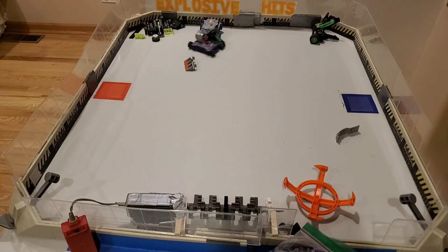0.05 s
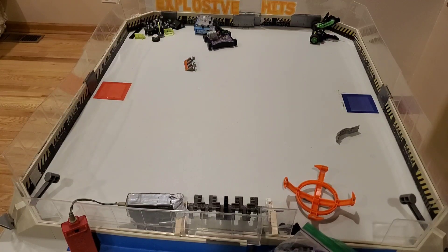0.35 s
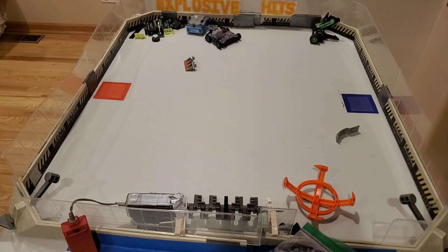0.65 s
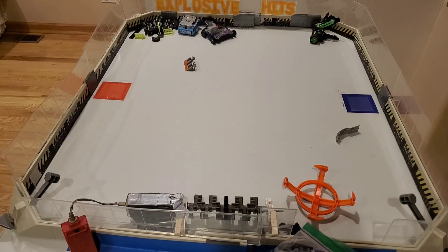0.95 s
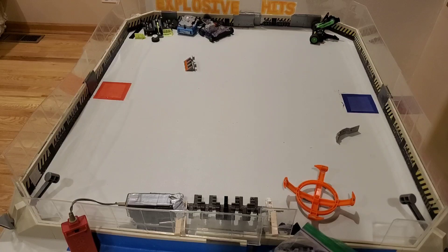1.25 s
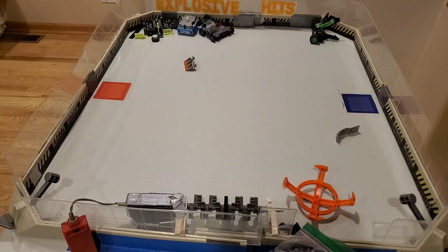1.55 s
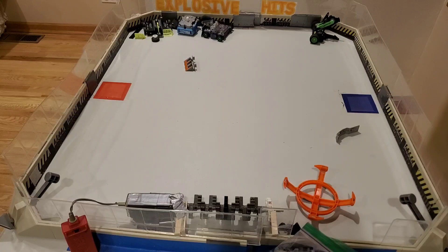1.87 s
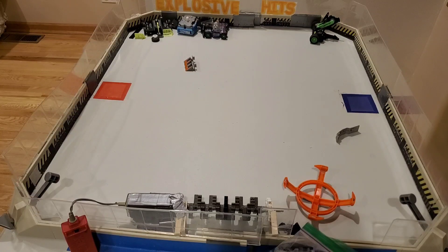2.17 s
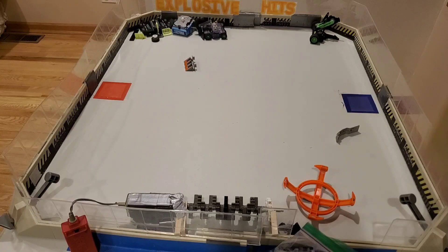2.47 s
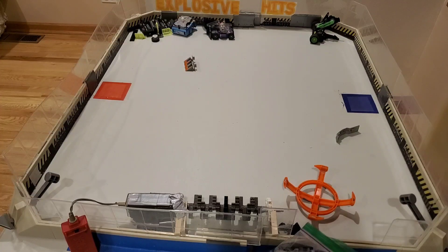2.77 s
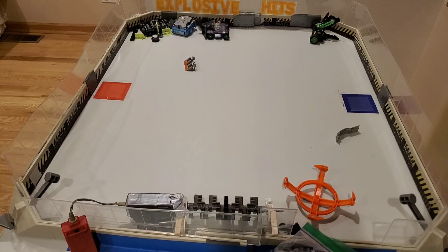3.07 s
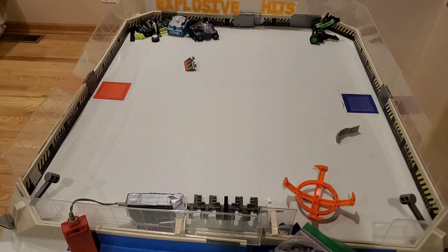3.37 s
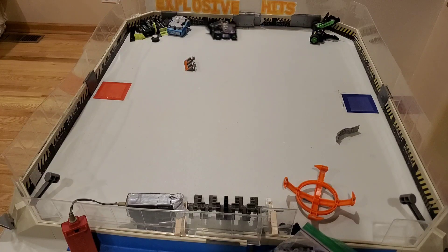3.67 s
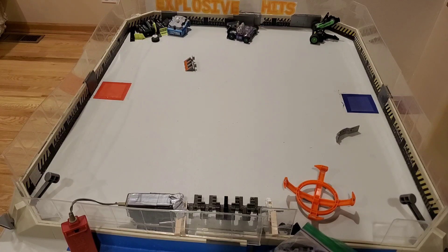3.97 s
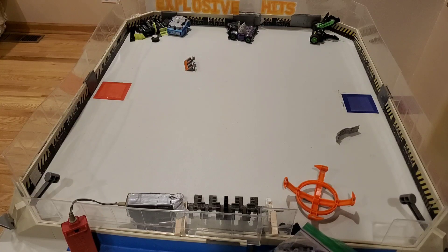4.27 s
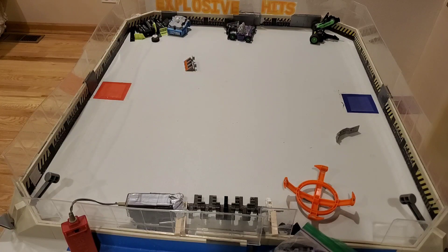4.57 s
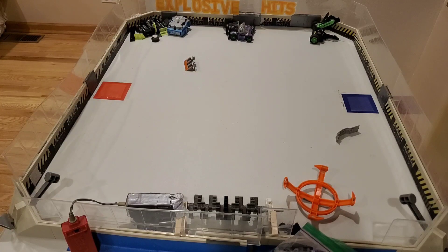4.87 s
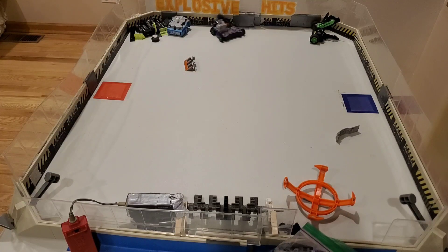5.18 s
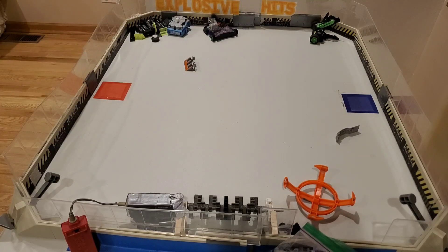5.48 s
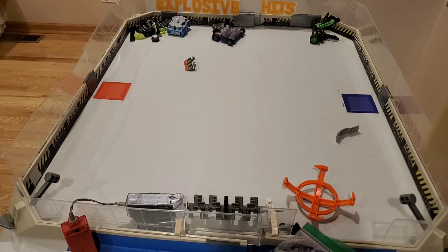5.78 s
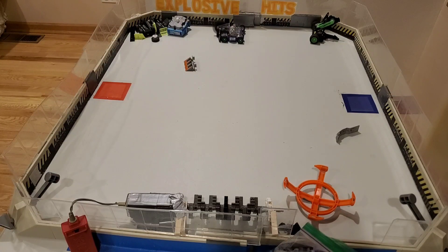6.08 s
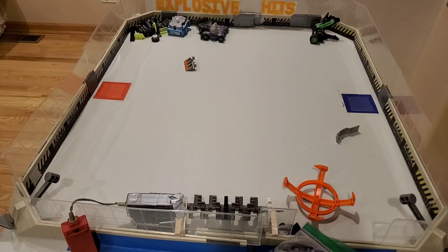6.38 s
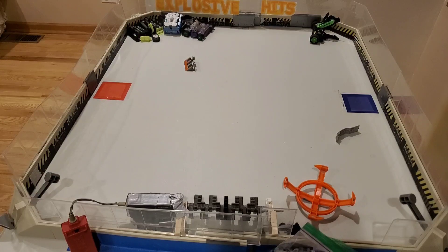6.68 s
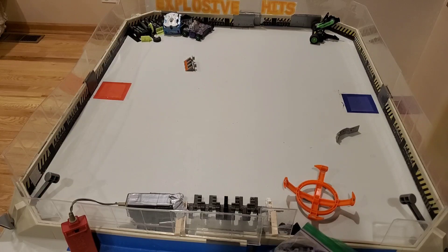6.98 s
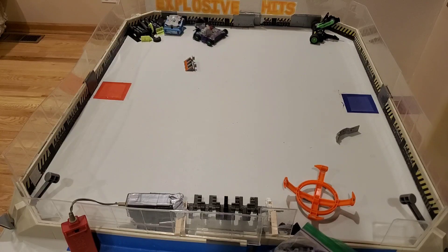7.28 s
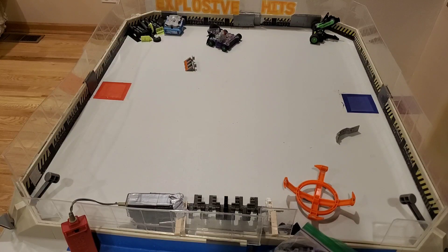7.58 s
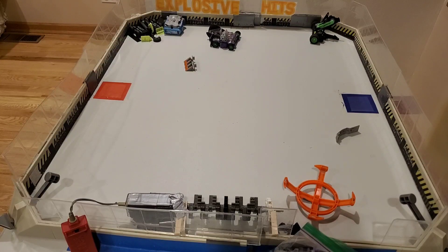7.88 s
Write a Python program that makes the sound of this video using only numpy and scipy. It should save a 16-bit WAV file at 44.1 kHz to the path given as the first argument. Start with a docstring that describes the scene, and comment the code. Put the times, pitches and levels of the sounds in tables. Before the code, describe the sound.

Two small toy robots fight in a table-top plastic arena. A spinning weapon hums through the floor with a fast, high ticking, slowing at each bite and speeding up again. Gears whirr and wheels drum in surges. Clusters of sharp clattering blows, small metallic pings and dull thuds break in. Near the end the weapon jams, leaving a faint stuttering motor buzz. The sound is in stereo, with a short room echo.

```python
"""A table-top arena with hard plastic walls, heard on a stereo pair: two small combat robots shove each
other at the far wall. An unbalanced spinning weapon hums through the floor panel and ticks once a turn;
it slows at each bite and spins up again. Gears whirr, wheels drum on the floor, blows clatter and ring,
a chassis thuds down. Then the weapon jams and a drive motor buzzes on faintly."""
import sys
import numpy as np
from scipy import signal
from scipy.fft import rfft, irfft
from scipy.io import wavfile

SR = 44100
rng = np.random.default_rng(int(sys.argv[2]) if len(sys.argv) > 2 else 0)


def write(x):
    x = np.atleast_2d(x).T
    wavfile.write(sys.argv[1], SR, np.round(np.clip(x, -1, 1) * 32767).astype(np.int16))


N = 354563
T = np.arange(N) / SR

# Modes of the floor panel, lowest first. Each row: frequency in Hz, width in Hz, gain in dB.
PANEL_MODES = [(54.2, 7.2, -8), (131.6, 21.5, 2.5), (193, 35, -4.5), (217.4, 30, -5.5), (247, 19.2, 2.5),
               (274, 50, -4.5), (342.5, 28.4, 6), (379.5, 45, 2), (431, 118, -7), (532, 78, -7),
               (715, 200, -13), (980, 760, -30.5)]


def from_db(db):
    """Decibels to gain."""
    return np.exp(np.asarray(db) * (np.log(10) / 20))


def unit_power(x):
    """Scale to unit power."""
    return x / np.sqrt(np.mean(x ** 2) + 1e-20)


def in_time(rows):
    """Each column of a curve, sample by sample."""
    seconds, *columns = np.transpose(rows)
    return [np.interp(T, seconds, column) for column in columns]


def at_hz(points, hz):
    """Read a table on a log-frequency axis."""
    knots_hz, values = np.transpose(points)
    return np.interp(np.log(hz + 1), np.log(knots_hz), values)


def drift(per_s):
    """Slow random wander, about 1 in size."""
    knots = rng.standard_normal(4096)
    return np.interp(T * per_s, np.arange(len(knots)), knots)


def through(x, response):
    """Pass a sound through an impulse response."""
    return signal.oaconvolve(np.atleast_2d(x), np.atleast_2d(response), axes=-1)[:, :N]


def response_of(spectrum, size=4096):
    """Causal (minimum-phase) impulse response with the given spectrum."""
    gain = from_db(at_hz(spectrum, np.linspace(0, SR / 2, size // 2 + 1)))
    cepstrum = irfft(np.log(gain))
    cepstrum[1:size // 2] *= 2
    cepstrum[size // 2 + 1:] = 0
    return irfft(np.exp(rfft(cepstrum)))


def colour(x, spectrum):
    """Shape a white sound, keeping its power."""
    response = response_of(spectrum)
    return through(x, response / np.linalg.norm(response))


def clicks(times, sizes):
    """Single-sample impulses."""
    return np.bincount(np.clip(np.asarray(times) * SR, 0, N - 1).astype(int), sizes, N)


def grains(per_s, spread_db):
    """Dense random contacts of uneven size; unit power."""
    touches = rng.random(N) < min(per_s / SR, .3)
    size, sign = rng.standard_normal((N // 3, 2))[:touches.sum()].T
    out = np.zeros(N)
    out[touches] = from_db(spread_db * np.clip(size, -2, 2)) * np.sign(sign)
    return unit_power(out)


def spray(times, sizes, t60, rise_s=0.00029):
    """Each contact throws a dying burst of micro-impacts and reflections with the energy of one click."""
    t = T[:SR // 2]
    shape = from_db(-120 * t / t60) * (1 - np.exp(-t / rise_s)) ** 2
    power = through(clicks(times, np.square(sizes)), shape / shape.sum())
    return np.sqrt(np.abs(power)) * rng.standard_normal((2, N))


def resonate(x, hz, width_hz):
    """One resonance with gain 1 at its peak."""
    r = np.exp(-np.pi * width_hz / SR)
    feedback = [1, -2 * r * np.cos(2 * np.pi * hz / SR), r * r]
    return signal.lfilter(np.array([1, 0, -1]) * (1 - r * r) / 2, feedback, x + 1e-18)


def butterworth(x, order, hz, kind):
    """Low-, high- or band-pass filter."""
    return signal.sosfilt(signal.butter(order, hz, kind, fs=SR, output="sos"), x)


def floor_panel(force, modes=PANEL_MODES):
    """The floor panel answers a force with its broad modes and radiates no deep bass."""
    swing = sum((-1) ** k * from_db(db) * resonate(force, hz, width)
                for k, (hz, width, db) in enumerate(modes))
    return butterworth(swing, 4, 42, "high")


def running_db(jam_s=6.75, fade_db_per_s=190):
    """Full level while the weapon spins, then a quick fade as it jams."""
    return -fade_db_per_s * np.maximum(T - jam_s, 0)


def weapon_hum(turns, hum_db, sway_db, uneven_db=3.5, wobble_db=1.5):
    """Unbalance shakes the floor once a turn, unevenly as the robot rocks; the panel picks overtones."""
    angle = 2 * np.pi * turns
    # The table sways when the turning rate nears its resonance; the floor drones at twice the rate.
    sway = from_db(0.5 + sway_db + wobble_db * drift(30)) * resonate(np.sin(angle), hz=57, width_hz=11)
    drone = from_db(5 + wobble_db * drift(30)) * resonate(np.sin(2 * angle), hz=133.8, width_hz=52)
    overtones = sum(np.sin(k * angle) * from_db(uneven_db * drift(20)) * (3 / k) ** 1.44
                    for k in range(3, 7))
    return from_db(hum_db + running_db()) * (sway + drone + floor_panel(overtones))


def weapon_ticks(turns, speed, slip_s=.0002, rebound_s=.0032, uneven_db=4.5, mix_db=5.0):
    """The loose rotor knocks once a turn and rebounds; each knock rings its modes in a new mix."""
    # Play in the weapon's bearing. Each row: time in seconds, relative level of the ticking in dB.
    bearing_play = [(0.0, -31), (0.3, -35), (0.6, -37), (0.9, -40.5), (1.4, -32), (1.9, -37), (2.2, -35),
                    (3.17, -33), (3.5, -36.5), (4.1, -31.5), (4.92, -29.5), (5.1, -34.5), (5.55, -35.5),
                    (5.9, -28.5), (6.5, -29), (6.62, -41.5)]
    # The tip grazes something and ticks harder. Each row: time in seconds, dB above the usual knock.
    grazes = [(3.984, 8.5), (4.095, 10), (4.365, 7), (4.404, 9), (4.457, 9), (4.639, 7), (6.135, 9)]
    # The rotor's brief ring. Each row: frequency in Hz, width in Hz, relative gain in dB.
    rotor_modes = [(6690, 1030, -4.5), (8080, 400, -9.5), (8800, 610, -8), (10020, 840, 1.5),
                   (11510, 730, 3.5), (13000, 1660, -4.5), (14700, 1400, -4)]
    tick_db = in_time(bearing_play)[0] + 1.1 * drift(15) + running_db()
    turn_s = T[1:][np.diff(np.floor(turns)) > 0]
    slip, size, delay, rebound = np.clip(rng.standard_normal((4, 1000))[:, :len(turn_s)], -1.7, 1.7)
    graze_s, graze_db = np.transpose(grazes)
    times = np.r_[turn_s + slip_s * slip, turn_s + rebound_s + .0009 * delay, graze_s]
    sizes = from_db(np.r_[uneven_db * size, -4 + 3 * rebound, graze_db])
    splash = from_db(-5) * spray(times, sizes, t60=0.008, rise_s=0.00019)
    off_walls = from_db(4) * spray(times, np.sqrt(sizes), t60=0.061, rise_s=0.0016)
    smear = splash + off_walls
    tilt_db_per_octave = 0.15 * (speed - 64.7)   # the ticks brighten with speed
    ring = 0
    for k, (hz, width, db) in enumerate(rotor_modes):
        mix = from_db(mix_db * np.clip(rng.standard_normal(2000)[:len(times)], -1.7, 1.7))
        gain = from_db(db + tilt_db_per_octave * np.log2(hz / 9900) + drift(9))
        ring = ring + (-1) ** k * gain * resonate(smear + clicks(times, sizes * mix), hz, width)
    ring = butterworth(ring, 3, 5200, "high")
    return from_db(tick_db + 0.47) * (unit_power(ring) + weapon_whine(smear))


def driving_db(idle_whirr_db=-43.5, idle_drum_db=-47, attack_s=0.029, release_db_per_s=157):
    """Levels of gears and wheels: each shove rises, holds and dies, adding its power to the idling."""
    # A robot drives or shoves. Each row: start and length in seconds, relative whirr and drumming in dB.
    shoves = [(0.0, 0.23, -39.5, -44.5), (0.21, 0.1, -45, -40.5), (0.47, 0.04, -46, -36),
              (0.732, 0.11, -41, -35.5), (1.075, 0.2, -42, -40), (1.589, 0.95, -42.5, -47.5),
              (2.217, 0.13, -32.5, -33.5), (2.447, 0.11, -34, -34), (2.653, 0.31, -45, -67),
              (3.046, 0.29, -38.5, -36), (3.604, 2, -41, -43), (4.954, 0.52, -38, -33),
              (5.59, 0.41, -42, -42), (6.22, 0.45, -41, -40.5), (6.575, 0.19, -36, -30.5),
              (7.179, 0.07, -55, -43.5), (7.249, 0.015, -44, -34.5), (7.35, 0.12, -45.5, -46.5),
              (7.627, 0.48, -67.5, -61.5)]
    power = from_db(2 * (np.array([[idle_whirr_db], [idle_drum_db]]) + running_db()))
    for start, length, whirr_db, drum_db in shoves:
        rise = np.clip((T - start) / attack_s, 0, 1)
        fall = from_db(-release_db_per_s * np.clip(T - start - length, 0, 1))
        power = power + (from_db([[whirr_db], [drum_db]]) * rise * fall) ** 2
    return 10 * np.log10(power)


def gears(turns, whirr_db, throb=0.2):
    """Gear teeth chatter, harder on one side of each turn; the walls give each microphone its share."""
    # Colour of the whirr. Each row: frequency in Hz, relative level in dB.
    whirr_spectrum = [(300, -1.5), (700, -7.5), (1150, -2), (1800, -4), (2600, 2.5), (3200, 3.5),
                      (3550, 5.5), (3950, 1.5), (6800, -3), (8400, -6), (11500, -8), (16000, -19)]
    direct = 0.58 * grains(per_s=6000, spread_db=6.0)
    off_walls = from_db(-3) * np.array([grains(12000, 4.4), grains(12000, 2.3)])
    teeth = (direct + off_walls) * (1 + throb * np.cos(2 * np.pi * turns))
    return colour(teeth * from_db(whirr_db + 2.06), whirr_spectrum)


def wheels(drum_db, bump_db=2.5):
    """Wheels and skids hop on the floor panel and scuff along it."""
    # Colour of the scuffing. Each row: frequency in Hz, relative level in dB.
    scuff_spectrum = [(30, -35), (55, 11), (130, -17.5), (350, -11), (600, -6), (1100, -7), (2000, -9.5),
                      (6000, -62.5)]
    hops = grains(per_s=900, spread_db=2.95) * from_db(drum_db + bump_db * drift(25))
    scuffs = np.array([grains(3000, 5.3), grains(3000, 3.25)]) * from_db(drum_db)
    return from_db(22) * floor_panel(hops) + from_db(-8.5) * colour(scuffs, scuff_spectrum)


def blows(clatter_t60=0.24, bite_t60=0.023):
    """Each blow is a snap, a short bite, a spray of clatter and the ring of armour and walls."""
    # Weapon and chassis strike. Each row: start in seconds, relative levels of low body, crack and
    # bright edge in dB, clatter in dB against the bite.
    strikes = [(0.127, -43.5, -26, -19, -5.5), (0.179, -55, -37.5, -29, -9), (0.211, -44, -36, -30, -4),
               (0.246, -36.5, -25.5, -23, -8), (0.351, -36, -25.5, -25, -4), (0.392, -39, -22.5, -22.5, -6),
               (0.415, -63, -29.5, -32, -20), (0.439, -39, -27.5, -25, -20), (0.496, -57, -29.5, -27, -3),
               (0.506, -37.5, -27, -26.5, -5), (0.739, -32.5, -28.5, -22.5, -3), (0.745, -41, -25, -37, 2),
               (0.764, -34, -29, -40, 17), (1.166, -37.5, -38, -34, -5), (2.268, -36, -27, -25, 5),
               (2.473, -39, -32, -27, 4), (2.571, -43, -52, -36, -3), (3.233, -40, -30, -25, -3),
               (3.241, -34.5, -31, -22, 3.5), (3.292, -33.5, -29.5, -42, 21), (3.377, -55, -29, -22.5, 5),
               (3.408, -58, -26, -19, 3), (3.431, -45, -37, -27.5, -11), (3.473, -52, -32.5, -20, -0.5),
               (3.503, -53.5, -38.5, -26.5, -6), (5.301, -19.5, -21, -19.5, -9.5),
               (5.328, -30.5, -30, -27, -7), (5.355, -23.5, -24.5, -25, -5), (5.381, -41, -35, -33, -3),
               (5.427, -24, -28.5, -25.5, -4), (5.456, -29.5, -27, -27, 3), (5.501, -37, -37, -36, 0),
               (5.515, -25.5, -27.5, -29, -4), (6.45, -61, -44, -26.5, -11),
               (6.559, -31.5, -23.5, -21.5, 5.5), (6.929, -70, -76, -68, -8), (6.98, -71, -77, -64, -15),
               (7.029, -81, -60, -54, -13), (7.117, -63, -51.5, -49, 2), (7.201, -73, -55, -57, -8),
               (7.254, -54, -42.5, -52, -2), (7.278, -39, -38, -55, 9), (7.598, -75, -53.5, -53, -5)]
    # Colours of body, crack and edge. Each row: frequency in Hz, relative level in dB.
    body_spectrum = [(100, -6.5), (300, 2.5), (600, 1), (1250, 5), (1900, 2), (3000, -8.5), (12000, -48)]
    crack_spectrum = [(300, -34), (1200, -8.5), (1900, -1), (3200, 6), (5000, 1), (7000, -3),
                      (10000, -36.5), (16000, -31)]
    edge_spectrum = [(3000, -20), (7000, -6), (10000, 0), (11600, 1), (13000, -5), (16000, -10)]
    # Modes of armour and walls. Each row: frequency in Hz, relative level in dB, t60 in seconds.
    armour_modes = [(562, -8.5, 0.22), (950, -16, 0.23), (1107, -11, 0.28), (1148, -9, 0.18),
                    (1228, -12, 0.29), (1330, -1.5, 0.18), (1570, -14, 0.44), (1713, -19, 0.25),
                    (1980, -10, 0.1), (2420, -5, 0.12), (2560, -7, 0.2), (2740, -11, 0.25),
                    (3015, -7, 0.122)]
    times, body_db, crack_db, edge_db, clatter_db = np.transpose(strikes)

    def struck(level_db):
        """Snap, bite and clatter share the energy of each blow."""
        size = from_db(level_db) / np.sqrt(0.79 + 0.56 * from_db(2 * clatter_db))
        snap = 0.47 * clicks(times, size)
        bite = spray(times, size, bite_t60)
        clatter = spray(times, size * from_db(clatter_db), clatter_t60, rise_s=0.00099)
        return snap + bite + clatter

    body = colour(struck(body_db + 28.5), body_spectrum)
    crack = colour(struck(crack_db + 28.0), crack_spectrum)
    edge = colour(struck(edge_db + 25.5), edge_spectrum)
    ring = 0
    for hz, mode_db, t60 in armour_modes:
        force = clicks(times, from_db(body_db + mode_db + 2.3 * rng.standard_normal(len(times))))
        ring = ring + t60 * resonate(force, hz, width_hz=np.log(1000) / np.pi / t60)
    return body + crack + edge + from_db(65) * ring


def steel_pings(t60=0.21, offset_hz=23):
    """A struck steel part rings with a close pair of modes, phased differently at each microphone."""
    # Small parts set ringing by blows. Each row: start in seconds, centre in Hz, level in dB.
    pings = [(0.246, 2690, -31), (0.351, 2500, -34), (0.392, 6470, -41), (0.415, 3130, -33),
             (0.506, 3730, -29), (0.506, 4500, -42), (0.765, 1853, -28), (3.473, 5857, -33),
             (5.355, 3840, -35), (5.355, 4527, -39), (5.515, 4210, -30.5), (7.028, 2356, -59)]
    out, t = np.zeros((2, N)), T[:SR // 2]
    for start_s, hz, db in pings:
        pair = sum(np.sin(2 * np.pi * (mode_hz * t + rng.random((2, 1))))
                   for mode_hz in (hz + offset_hz, hz - offset_hz)) / np.sqrt(2)
        start = int(start_s * SR)
        out[:, start:start + len(t)] += pair * from_db(db - 60 * t / t60)
    return out


def chassis_thuds(push_s=0.0011, sway_s=0.026):
    """A dropped chassis pushes the panel briefly; drops and rocking sway the table in its lowest mode."""
    # A chassis drops, or only rocks softly. Each row: start in seconds, relative level in dB.
    drop_events = [(0.789, -6.5), (1.111, -7.5), (2.272, -2), (3.331, -12), (5.298, -28), (5.426, -8),
                   (6.574, -1.5), (6.629, -1.5), (6.752, -3.5), (7.118, -24.5), (7.28, -28)]
    rock_events = [(7.049, -38), (7.119, -40), (7.406, -29.5), (7.717, -40.5)]
    drops, rocks = [clicks(times, from_db(db))
                    for times, db in map(np.transpose, (drop_events, rock_events))]
    t = T[:SR]
    push = t / push_s * np.exp(-np.pi * t / push_s)
    knock = floor_panel(through(drops, push / push.sum()), PANEL_MODES[1:])
    sway = np.sin(2 * np.pi * PANEL_MODES[0][0] * t) * t / sway_s * np.exp(1 - t / sway_s)
    return from_db(29) * knock + from_db(-5) * through(from_db(-30) * drops + rocks, sway)


def weapon_whine(knocks, roughness_hz=230):
    """The rotor's knocks excite a narrow band that glides, swelling and fading on its way."""
    # Rough whines as the weapon gains or loses speed. Each row: start and length in seconds,
    # first and last pitch in Hz, level in dB against the ticking.
    glides = [(2.543, 0.75, 7670, 9700, -9.5), (2.603, 0.97, 10100, 12600, -10),
              (3.476, 0.39, 6440, 9400, -10.5), (5.55, 0.39, 8520, 7080, -14)]
    rasp = unit_power(butterworth(knocks, 2, roughness_hz, "low"))
    tone = np.zeros(N)
    for start, length, from_hz, to_hz, db in glides:
        now = (T > start) & (T < start + length)
        progress = (T[now] - start) / length
        phase = 2 * np.pi * np.cumsum(from_hz + (to_hz - from_hz) * progress) / SR
        tone[now] += from_db(db) * np.sqrt(2 * np.sin(np.pi * progress)) * np.sin(phase)
    return rasp * tone


def drive_buzz(start_s=7.59, pulse_hz=118, surge_db=9.0, stutter_hz=20.85, slip_s=0.00047):
    """A slow motor buzzes with its controller's pulses, stuttering as the wheel grips and slips."""
    # Rasp of the motor's brushes. Each row: frequency in Hz, relative level in dB.
    rasp_spectrum = [(400, -12), (1050, 8), (1400, -14), (1900, -20), (3000, 6), (4000, -3.5), (6500, -1),
                     (16000, -9)]
    times = np.arange(start_s, T[-1], 1 / pulse_hz)
    size, slip = rng.standard_normal((len(times), 2)).T
    grip_db = surge_db * np.cos(2 * np.pi * stutter_hz * (times - start_s))
    pulses = clicks(times + slip_s * slip, from_db(grip_db + 2.7 * size))
    brushes = clicks(times, from_db(4.4 * size)) + spray(times, from_db(grip_db / 2), t60=0.028)
    buzz = from_db(-33) * floor_panel(pulses) + from_db(-10.5) * resonate(pulses, hz=332, width_hz=36.4)
    return buzz + from_db(-45) * colour(brushes, rasp_spectrum)


def reflections(t60):
    """Two independent dying tails of echoes, each with unit energy."""
    t = T[:SR // 2]
    echoes = rng.standard_normal((2, len(t))) * from_db(-60 * t / t60) * (1 - np.exp(-t * 2000))
    return echoes / np.linalg.norm(echoes, axis=1, keepdims=True)


def room_reverb(x, bands=8):
    """Arena and room reverberate; the bass is alike at both microphones, the treble dies first."""
    # Decay of the reverberation. Each row: frequency in Hz, t60 in seconds.
    decay_times = [(100, .47), (300, .39), (1800, .37), (5000, .38), (9000, .32), (14000, .27)]
    edges, tail = np.geomspace(60, 18000, bands + 1), 0
    for low, high in zip(edges, edges[1:]):
        hz = np.sqrt(low * high)
        mid, side = reflections(at_hz(decay_times, hz))
        apart = np.pi / 4 * hz / (hz + 500)
        echoes = np.cos(apart) * mid + np.sin(apart) * side * [[1], [-1]]
        tail = tail + butterworth(echoes, 2, [low, high], "band")
    return through(x, tail)


def room_tone():
    """A quiet, steady rumble and hiss."""
    # Colour of the background. Each row: frequency in Hz, relative level in dB.
    background_spectrum = [(30, 7.5), (120, -14), (350, -16), (1000, -10), (2000, -36), (3000, -21),
                           (16000, -47.5)]
    return from_db(-57.5) * colour(rng.standard_normal((2, N)), background_spectrum)


def scene():
    """Robots at the arena's far wall, with the room around them."""
    # The weapon slows at each bite and spins up again. Each row: time in seconds, turns per second,
    # relative hum level in dB, extra gain of the table's sway in dB.
    weapon_run = [(0.0, 66, -42, -1), (0.2, 63, -49.5, -8), (0.44, 48, -42.5, -8), (0.62, 63, -56, -2),
                  (0.83, 38, -62, 15), (1.23, 55, -38.5, 2), (1.5, 61, -44, 4.5), (1.73, 71, -42, 4),
                  (2.15, 78, -46.5, 8), (2.36, 54, -47, 2), (2.6, 65.5, -45.5, 3), (3.05, 77, -46, 7),
                  (3.36, 60, -63, 3), (3.55, 66, -41.5, -4), (3.72, 68, -42, 1), (3.85, 66, -46, 5),
                  (4.0, 70, -39.5, -1), (4.3, 75, -38.5, -1), (4.8, 78, -37, -9), (5.29, 74, -41, -6),
                  (5.44, 63, -44, -8), (5.65, 69.5, -39, 2), (6.0, 65, -44.5, 5.5), (6.2, 60, -40.5, 2.5),
                  (6.4, 55, -40.5, 0), (6.78, 54, -51, 2)]
    speed, hum_db, sway_db = in_time(weapon_run)
    whirr_db, drum_db = driving_db()
    turns = np.cumsum(speed * (1 + .005 * drift(15))) / SR
    motors = weapon_ticks(turns, speed) + gears(turns, whirr_db) + drive_buzz()
    floor = weapon_hum(turns, hum_db, sway_db) + wheels(drum_db) + chassis_thuds()
    hits = blows() + steel_pings()
    reverb = room_reverb(from_db(-8) * motors + from_db(-3) * hits + from_db(-8.5) * floor)
    return motors + floor + hits + reverb + room_tone()


def record(dry, cutoff_hz=15950):
    """The two microphones differ in colour; peaks are rounded and the top is cut."""
    # Lean of the microphone pair. Each row: frequency in Hz, left minus right in dB.
    lean = [(50, -3.5), (130, 0), (350, 0.2), (700, 1.5), (1400, 3.5), (3000, 3.5), (5500, 5.5), (6900, 5),
            (7900, 5), (9000, 3), (10200, -3), (11600, 1.5), (13600, 6), (15500, 15)]
    sides = [response_of([(hz, sign * db / 2) for hz, db in lean]) for sign in (1, -1)]
    rounded = np.tanh(through(dry, sides))
    return signal.sosfilt(signal.ellip(12, .1, 80, cutoff_hz, fs=SR, output="sos"), rounded)


dry = scene()
out = record(dry)
write(out)
```